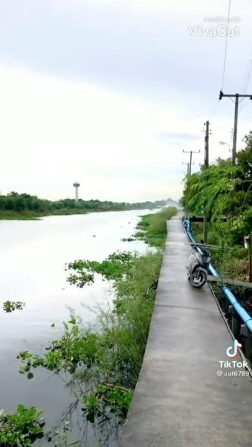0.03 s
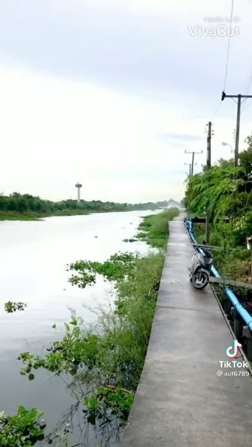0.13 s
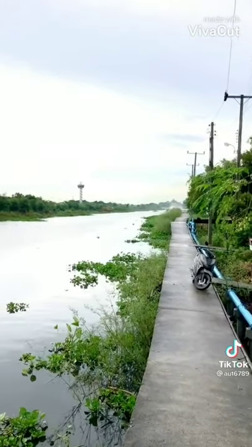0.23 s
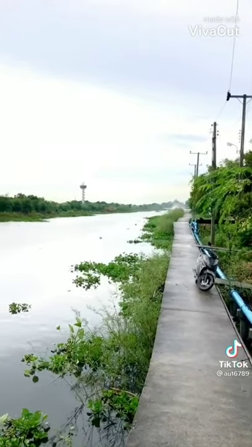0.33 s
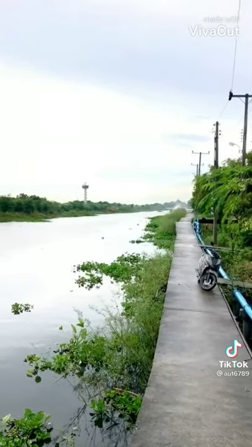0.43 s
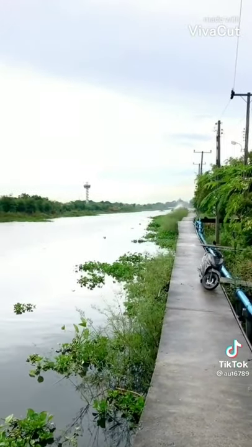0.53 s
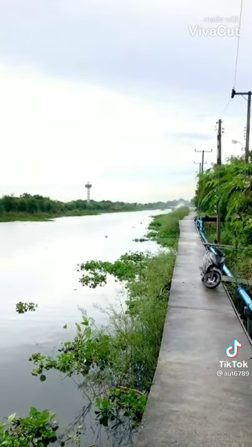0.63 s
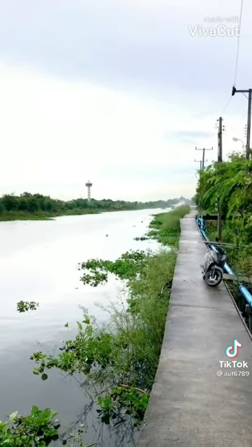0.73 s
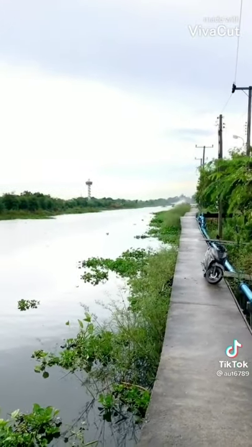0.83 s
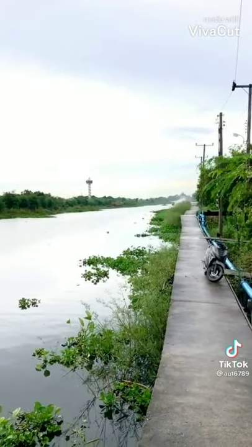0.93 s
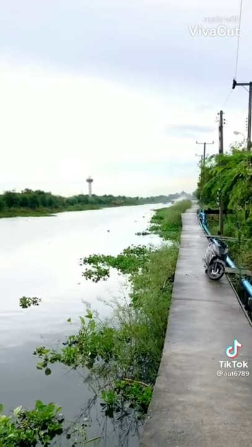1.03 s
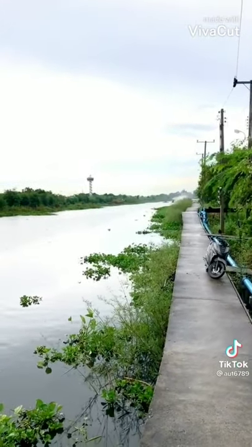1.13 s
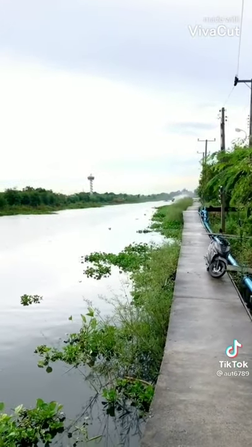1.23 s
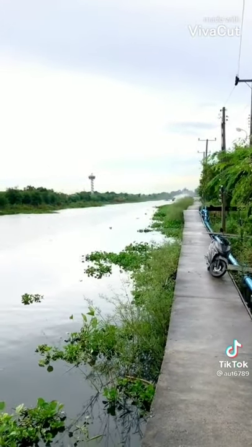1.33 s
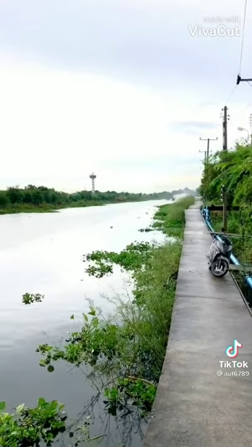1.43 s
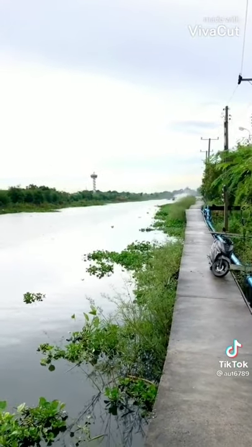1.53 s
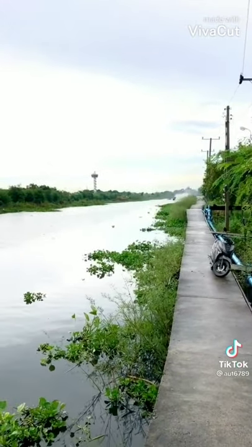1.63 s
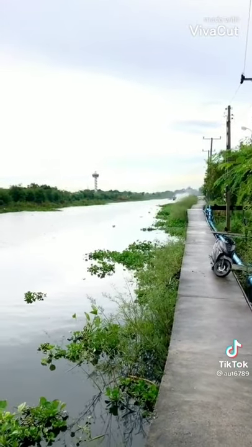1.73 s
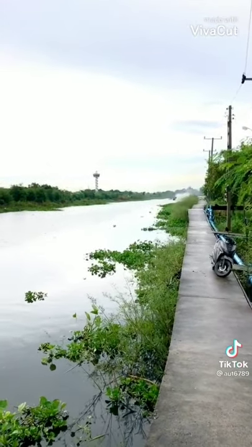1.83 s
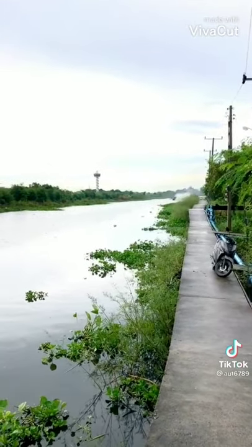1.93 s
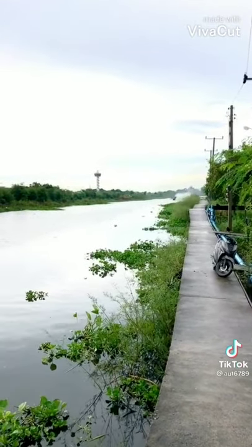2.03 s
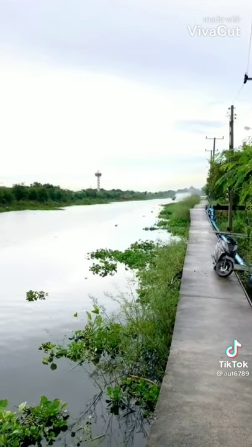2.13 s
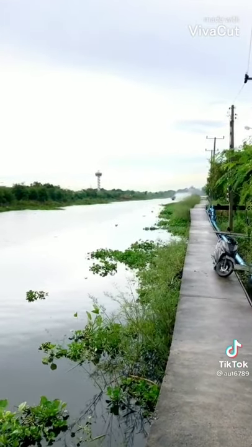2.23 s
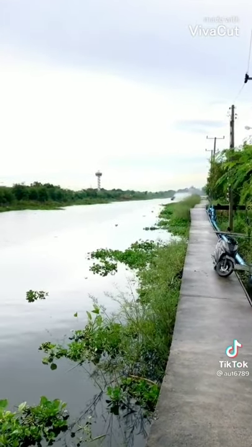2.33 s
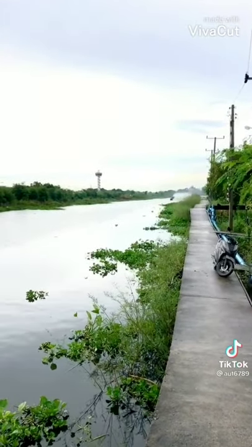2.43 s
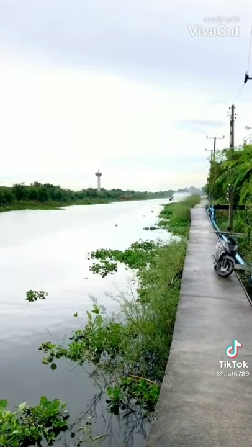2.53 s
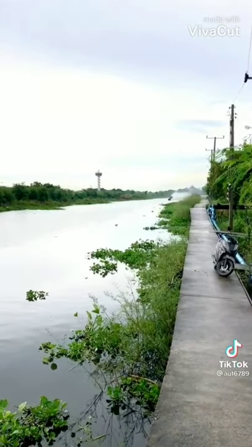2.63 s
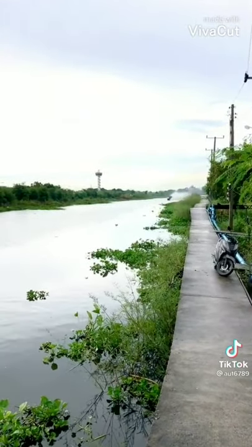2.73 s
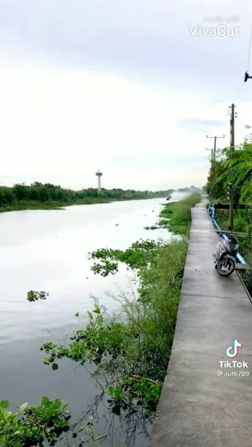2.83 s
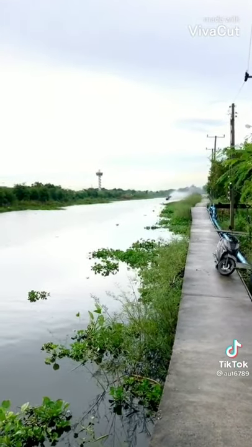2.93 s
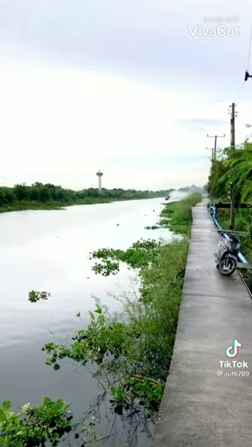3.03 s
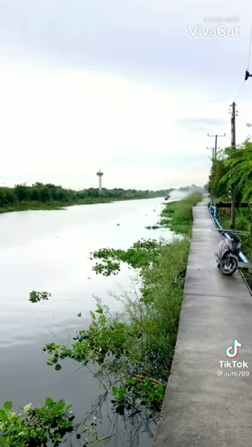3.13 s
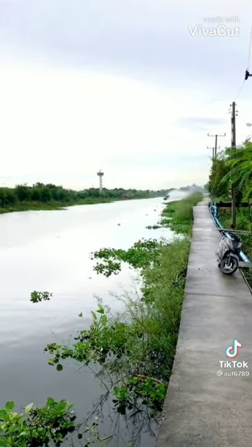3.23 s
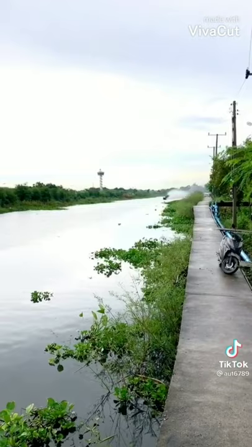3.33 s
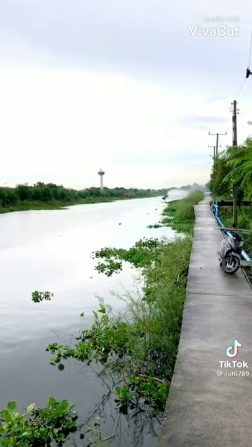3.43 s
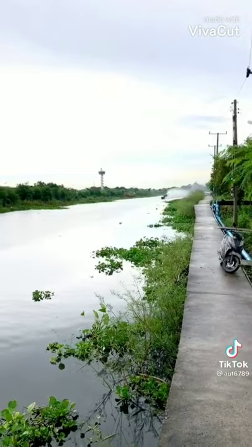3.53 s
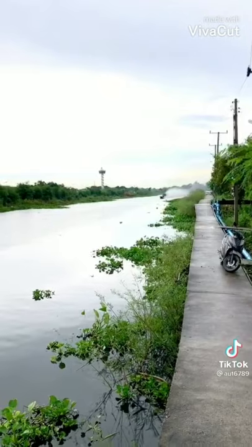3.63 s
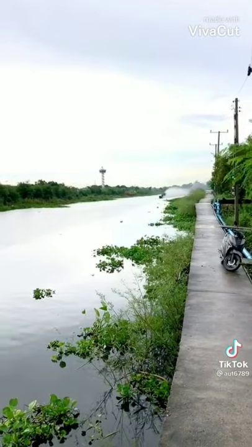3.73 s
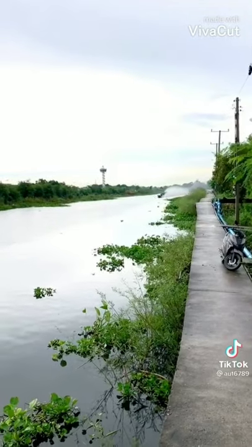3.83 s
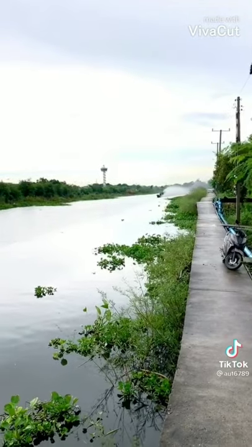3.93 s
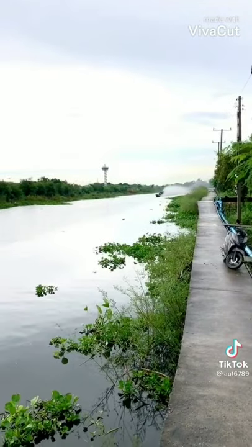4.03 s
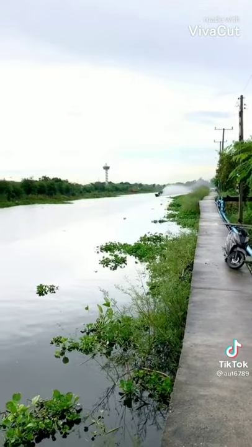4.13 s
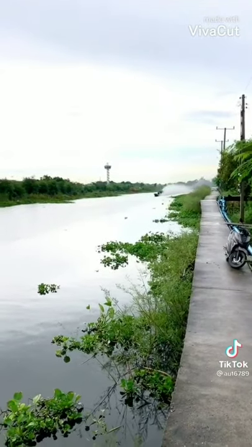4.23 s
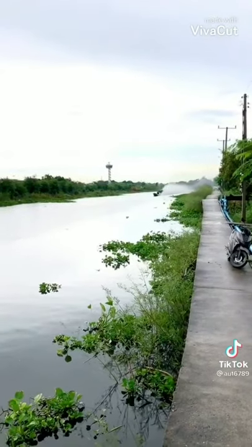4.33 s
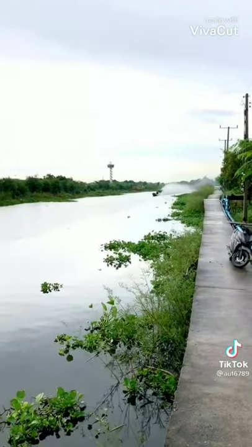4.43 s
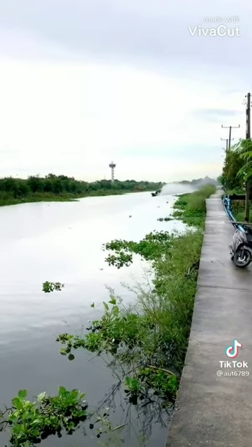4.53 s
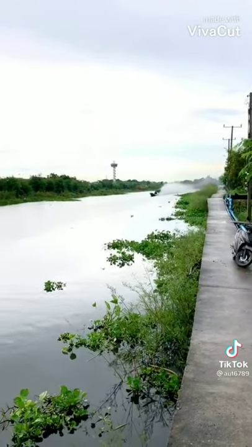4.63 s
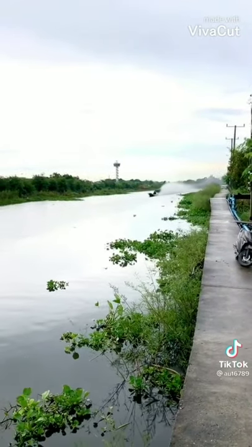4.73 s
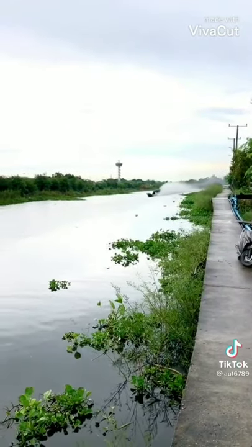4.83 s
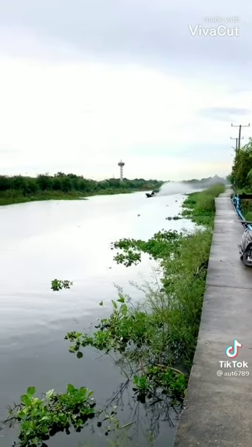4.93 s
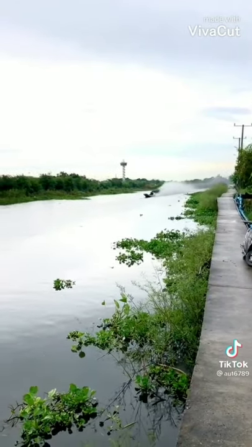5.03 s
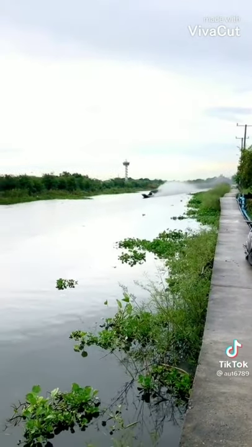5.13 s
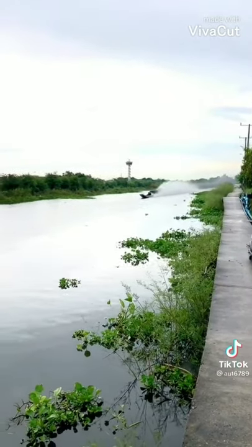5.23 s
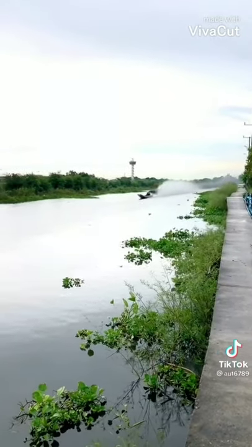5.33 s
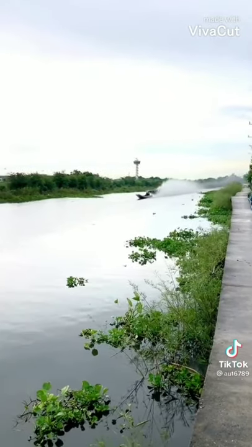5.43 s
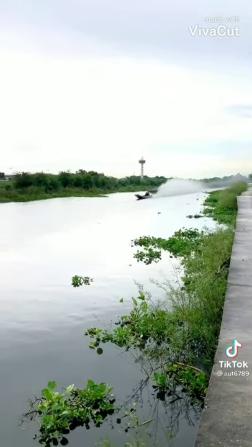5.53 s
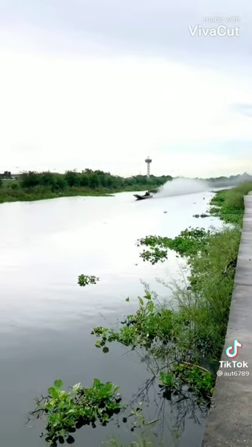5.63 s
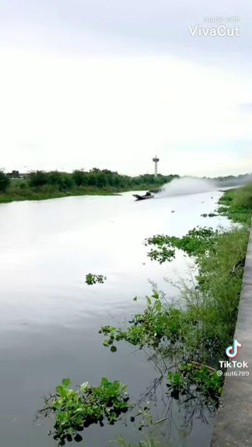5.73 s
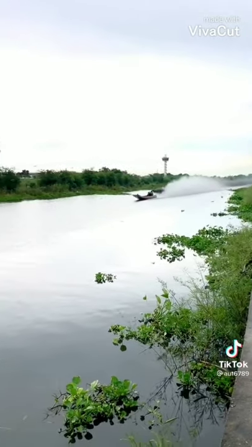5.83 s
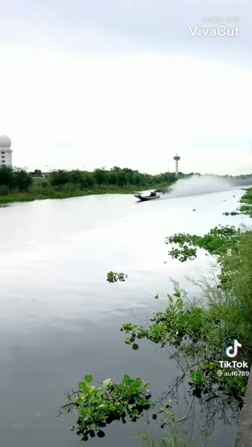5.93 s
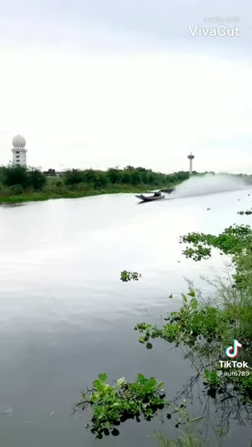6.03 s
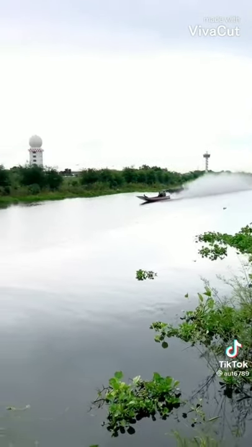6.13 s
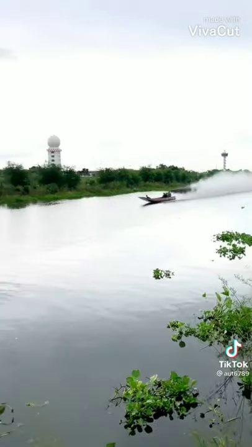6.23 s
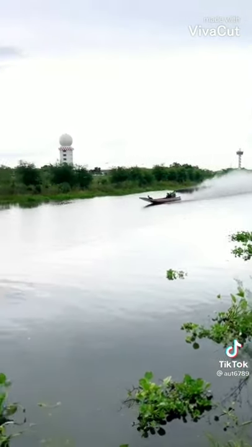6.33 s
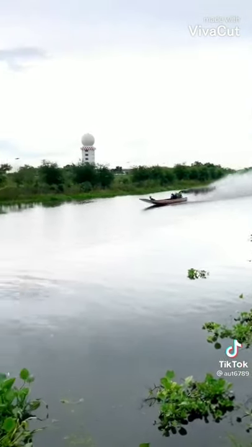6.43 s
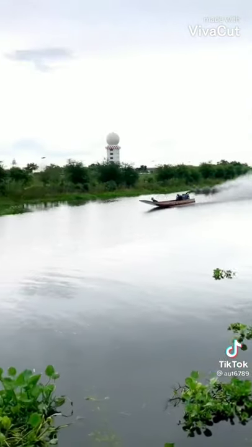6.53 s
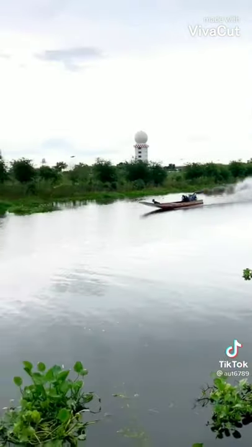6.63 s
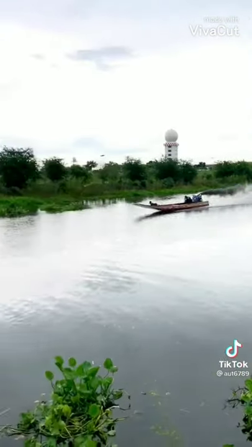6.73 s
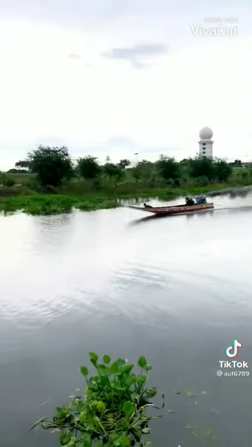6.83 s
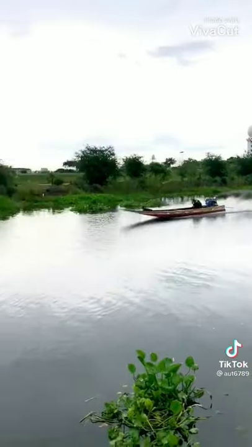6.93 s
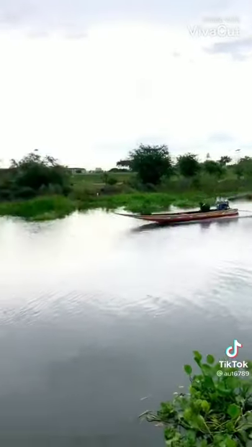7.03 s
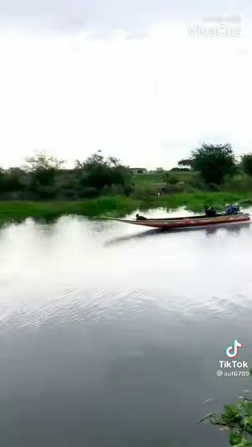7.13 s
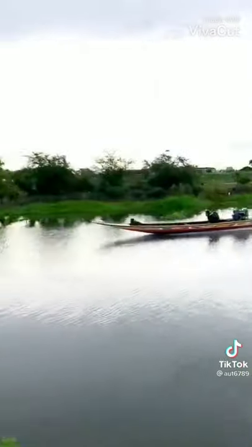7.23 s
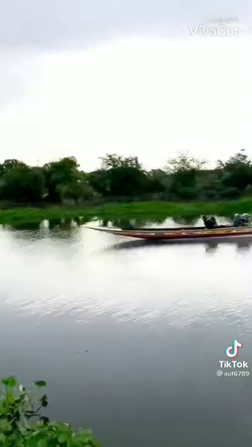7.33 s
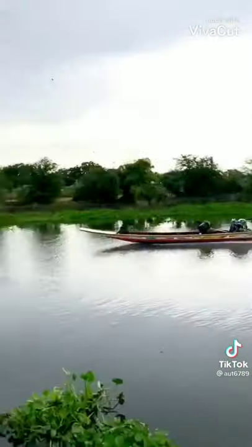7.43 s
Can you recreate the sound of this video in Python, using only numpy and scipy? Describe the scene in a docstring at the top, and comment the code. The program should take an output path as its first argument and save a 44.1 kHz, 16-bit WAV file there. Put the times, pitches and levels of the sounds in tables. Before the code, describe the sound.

Outdoors beside a canal, heard in mono through a phone microphone. From 0 s a faint, distant boat engine drones at a steady high rev, its firing tone near 160 Hz swelling and fading over the water, with soft water-and-air hiss beneath. From about 0.5 s a very thin whine around 2.5 kHz and its overtones creeps in, clearer after 3 s, flickering and flaring between 4 and 5.5 s. The engine pitch slowly climbs to nearly 200 Hz by 5 s while low hull rumble and rough exhaust roar build. The whine stops abruptly near 5.6 s. From 6 s the boat is close: harsh, ragged exhaust, bright grainy spray hiss and quick splashy gouts. The roar peaks around 6.75 s, slightly squashed by the microphone; then pitch dips a little and spray stays strong as the boat draws level, ending still loud at 7.5 s.

```python
"""On a canal bank, a phone hears a long-tail boat at full throttle come up from far away and draw level.
The exhaust fires twice a crank turn: sines at the engine orders over a rough roar of puffed noise.
The propeller throws a hissing plume of spray, hull and wake drone below, and far water and air hiss.
A thin harmonic whine shows on the approach, then stops.
The air takes less treble the nearer the boat is, and a bounce off water and bank cuts a moving band.
"""
import sys
import numpy as np
from scipy import signal
from scipy.io import wavfile
from scipy.ndimage import uniform_filter1d

SR = 44100
rng = np.random.default_rng(int(sys.argv[2]) if len(sys.argv) > 2 else 0)


def master(y):
    """Save y as 16-bit WAV."""
    cut = np.clip(np.atleast_2d(y).T, -1, 1)
    pcm = np.round(cut * 32767)  # scale
    wavfile.write(sys.argv[1], SR, pcm.astype(np.int16))


def invert_db(level):
    """Linear amplitude ratio for a level in decibels (20 dB per decade), elementwise."""
    return 10 ** (np.asarray(level, dtype=float) / 20)


N = 329868  # samples

# Straight run past the phone: speed in m/s, moment abreast in s, nearest distance in m.
SPEED_M_PER_S, LEVEL_S, NEAREST_M = 25, 7.3, 14
AIR_DB_PER_M = 0.1069  # treble lost to the air at 8500 Hz
# Direct sound and its bounce off water and bank cancel in a moving band.
# Each row: time in seconds, centre in Hz, depth in dB.
BOUNCE_DIP = [(0, 420, 1.5), (1.3, 440, 6), (2.3, 530, 6), (3.2, 804, 3.5), (3.7, 1080, 3), (4.2, 1509, 0)]
# The boat at the bank. Each row: time in seconds, crank turns per second as heard in Hz,
# roar level in dB, spray level in dB.
BOAT_RUN = [(0.0, 80.4, -52.5, -57.5), (0.5, 82.24, -49, -56.5), (1.2, 83.1, -47.5, -54.5),
            (2.0, 87.8, -46, -52), (2.6, 91.2, -44.5, -50), (3.2, 92.9, -42.5, -47),
            (3.8, 95.1, -39, -43.5), (4.3, 96.8, -35, -41), (4.8, 98.4, -32, -34),
            (5.15, 99.37, -25.5, -30), (5.7, 98.32, -22, -28.5), (6.1, 98.76, -19, -25.5),
            (6.45, 98.4, -16, -22.5), (6.75, 98.26, -9.5, -17), (7.1, 96.28, -13.5, -18),
            (7.48, 93.6, -17.5, -17)]

# Far water and air, relative spectrum. Each row: frequency in Hz, density in dB per Hz.
FAR_HISS_SPECTRUM = [(590, -30), (1000, -4), (1200, 2.5), (1650, 7), (2220, -16), (2410, -10), (3390, -13),
                     (8340, -18), (15300, -32)]
FAR_HISS_DB = -60
# Hull and wake, relative spectrum. Each row: frequency in Hz, density in dB per Hz.
RUMBLE_SPECTRUM = [(15, -46), (25, -10.5), (81, 2.5), (119, 0), (145, 0.5), (173, -2), (200, -23),
                   (260, -5.5), (440, -120)]
# Rumble in dB when the roar is at NEAR_ROAR_DB, and the share of the roar's rise in dB that it follows.
RUMBLE_NEAR_DB, RUMBLE_SHARE, NEAR_ROAR_DB = -27, 0.4, -12

# The whine before flares and flicker. Each row: time in seconds, pitch in Hz,
# peak level of the second partial in dB, peak level of the fifth partial in dB.
WHINE_TRACK = [(0.5, 2465, -78, -101), (1.3, 2500, -73, -99), (2.5, 2546, -71, -101), (3.3, 2636, -59, -93),
               (3.85, 2660, -60, -84), (4.1, 2630, -52, -79), (4.55, 2645, -49, -77), (5.0, 2642, -42, -69),
               (5.56, 2632, -44, -68)]
# Partials 1, 3 and 4 against the second in dB, before the air's loss.
WHINE_PARTIALS_DB = [-9, -9, -18]
# Moments when the whine flares. Each row: time in seconds, rise of the fifth partial in dB.
WHINE_FLARES = [(4.02, 7), (4.12, 8), (4.36, 2), (4.64, 11), (4.87, 9), (4.99, 10), (5.14, 16), (5.32, 9),
                (5.48, 12)]
FLARE_S, FLARE_LOW = .04, .3  # width in s, share of the rise in dB given to the lower partials

# The plume close by, relative spectrum. Each row: frequency in Hz, density in dB per Hz.
SPRAY_SPECTRUM = [(290, -15), (500, -10), (620, 2), (695, -12.5), (779, -6), (1020, -10.5), (1530, -7.5),
                  (1660, -8), (2060, -10.5), (2670, -9), (3700, -12), (5690, -15), (8620, -14.5),
                  (13600, -26.5), (15300, -30)]
# The clearest gouts of spray. Each row: time in seconds, strength in dB before its share of level and treble.
SPRAY_GOUTS = [(4.825, 5.5), (5.03, 2.5), (5.077, 5), (5.12, 5.5), (5.21, -4), (5.391, 4), (6.179, 3.5),
               (6.221, 3.5), (6.48, 3), (6.618, 3), (6.708, 1), (6.75, 0.5), (6.778, 4.5), (6.88, 2),
               (6.955, 3), (7.115, 3), (7.228, 7.5), (7.256, 4), (7.305, 6), (7.363, 6.5), (7.425, 3),
               (7.453, 6.5), (7.468, 0)]
# Bands heard from the side of the boat. Each row: centre in Hz, width in Hz, rise in dB.
ABEAM_BANDS = [(1720, 290, 5), (2630, 500, 3.5)]

# The roar close by, relative spectrum. Each row: frequency in Hz, density in dB per Hz.
ROAR_SPECTRUM = [(53, -42), (90, -20), (140, -2), (174, -3.5), (199, 2), (267, -5), (332, -4.5),
                 (385, -6.5), (426, -3), (589, -8), (734, -10), (1190, -14.5), (2170, -34), (3000, -35),
                 (3900, -64), (6600, -120)]
# Exhaust pipe resonances. Each row: centre in Hz, width in Hz, rise in dB.
PIPE_RESONANCES = [(374, 17, 14.5), (652, 200, 5.5)]

# Propeller load beats the engine tones: rate as a share of crank rate, each sideband in dB under its tone.
PROP_RATIO, PROP_DB = .28, -14
# The firing tone swells and fades on its way over the water. Each row: time in seconds, level in dB.
FIRING_LEVEL = [(0, -40), (.62, -40.5), (.75, -70), (1.0, -58), (1.15, -44.5), (1.62, -43.5), (1.75, -45),
                (2.0, -45), (2.5, -39.5), (3.0, -43), (3.15, -34), (3.62, -40), (3.75, -42), (3.95, -40),
                (4.12, -58), (4.28, -35), (4.4, -35), (4.62, -30), (5.25, -29.5), (5.4, -31), (5.65, -26.5),
                (6.0, -26), (6.15, -17.5), (6.7, -14.5), (6.88, -18), (7.0, -11.5), (7.25, -16),
                (7.38, -29.5), (7.48, -14.5)]
# The other engine orders. Each row: time in seconds, order four in dB, even orders six and up in dB,
# odd orders in dB, once-a-turn beat in dB.
ORDER_LEVELS = [(0, -55, -59, -60, -54), (.55, -55, -58, -63, -57), (1.0, -59, -63, -63, -52),
                (1.5, -55, -62, -61, -46), (1.9, -52, -61, -57, -53), (2.35, -53, -62, -57, -47),
                (2.9, -48, -56, -51, -48), (3.6, -46, -52, -46, -43), (4.1, -42, -44, -44, -39),
                (4.6, -40, -43, -40, -38), (5.15, -32, -36, -34, -37), (5.75, -30, -35, -34, -34),
                (6.0, -28, -29, -35, -37), (6.3, -24, -24, -31, -30), (6.75, -22, -33, -32, -35),
                (6.95, -29, -33, -33, -35), (7.15, -29, -30, -33, -36), (7.48, -25, -33, -36, -35)]
# Engine order to the level it follows: a column of ORDER_LEVELS, counted from 0 after the time.
ORDER_COLUMN = {1: 3, 3: 2, 4: 0, 5: 2, 6: 1, 7: 2, 8: 1, 9: 2, 10: 1}
# Each of those orders in turn, against the level it follows, in dB.
ORDER_OFFSET_DB = [-1, 0, 0, -2, 0, -8, -4, -14, -9]


def evened(x):
    """Scales to rms 1."""
    return x / np.sqrt(np.mean(x ** 2) + 1e-20)


def read(points, hz):
    """A spectrum table read on a log-frequency axis."""
    f, value = np.transpose(points)
    return np.interp(np.log(hz + 1), np.log(f + 1), value)


def columns(rows, t):
    """The columns of a curve table at times t."""
    s, *rest = np.transpose(rows)
    return [np.interp(t, s, c) for c in rest]


def resonances_db(bands, hz):
    """Sum of rounded peaks (centre Hz, width Hz, dB)."""
    return sum(db / (1 + (2 * (hz - f) / width) ** 2) for f, width, db in bands)


def slow(per_s):
    """Random drift of rms 1 with about per_s wiggles a second."""
    span = max(int(SR / per_s), 1)
    smooth = uniform_filter1d(rng.standard_normal(N), span)
    return evened(uniform_filter1d(smooth, span))


def shaped(x, colour_db, band, size):
    """Colours x frame by frame; each frame's gain is scaled to keep rms 1 inside band (lo, hi Hz)."""
    overlap = size * 3 // 4
    hz, t, z = signal.stft(x, SR, nperseg=size, noverlap=overlap)
    gain = invert_db(colour_db(hz[:, None], t))
    inside = (hz >= band[0]) & (hz < band[1])
    gain = gain / np.sqrt((gain[inside] ** 2).sum(0) / len(hz))
    return signal.istft(z * gain, SR, nperseg=size, noverlap=overlap)[1][:N]


def far_db(t):
    """Air loss at 8500 Hz over the distance beyond the nearest, as negative dB."""
    distance_m = np.hypot(NEAREST_M, SPEED_M_PER_S * (LEVEL_S - t))
    return -AIR_DB_PER_M * (distance_m - NEAREST_M)


def air_loss_db(hz, t, power=2.07):
    """Distance dulls the treble: the loss grows as a power of frequency."""
    return far_db(t) * (hz / 8500) ** power


def bounce_db(hz, t, octaves=0.47, lift=0.065):
    """The bounce cancels one band, with a gentle lift below it where the two paths add."""
    dip_hz, depth_db = columns(BOUNCE_DIP, t)
    away = np.log2((hz + 1) / dip_hz) / octaves  # distance from the dip in dip widths
    return depth_db * (lift * np.exp(-(away + 1.5) ** 2) - np.exp(-away ** 2))


def crank(t):
    """Crank angle in turns; the flywheel smooths every change of speed."""
    speed_hz = columns(BOAT_RUN, t)[0]
    return np.cumsum(uniform_filter1d(speed_hz, size=SR // 3)) / SR


def air():
    """Steady faint hiss of far water and air: noise of one fixed colour."""
    def colour(hz, frames):
        return read(FAR_HISS_SPECTRUM, hz) + 0 * frames
    return invert_db(FAR_HISS_DB) * shaped(rng.standard_normal(N), colour, (1000, 15400), size=1024)


def rumble(t, surge_db=1.0):
    """Hull and wake droning low: noise that rises more gently than the roar and surges a little."""
    def colour(hz, frames):
        return read(RUMBLE_SPECTRUM, hz) + 0 * frames
    low = shaped(rng.standard_normal(N), colour, (40, 140), size=4096)
    roar_rise_db = columns(BOAT_RUN, t)[1] - NEAR_ROAR_DB
    return invert_db(RUMBLE_NEAR_DB + RUMBLE_SHARE * roar_rise_db + surge_db * slow(5.7)) * low


def whine(t, fuzz=.0045, flicker_db=3):
    """A thin whine of five harmonic partials: pitch jitter (share of pitch) fuzzes it, levels flicker."""
    hz, second_db, fifth_db = columns(WHINE_TRACK, t)
    flare_db = sum(db * np.exp(-((t - s) / FLARE_S) ** 2 / 2) for s, db in WHINE_FLARES)
    second_db = second_db + FLARE_LOW * flare_db
    fifth_db = fifth_db + flare_db
    fuzzy_hz = uniform_filter1d(hz, size=SR // 8) * (1 + fuzz * slow(284))
    turns = np.cumsum(fuzzy_hz) / SR
    # the air's loss on partials 1, 3 and 4 against its loss on the second
    loss_db = [air_loss_db(k * hz, t) - air_loss_db(2 * hz, t) for k in (1, 3, 4)]
    first_db, third_db, fourth_db = (second_db + db + loss for db, loss in zip(WHINE_PARTIALS_DB, loss_db))
    out = np.zeros(N)
    for k, db in enumerate([first_db, second_db, third_db, fourth_db, fifth_db], start=1):
        out += invert_db(db + flicker_db * slow(70)) * np.cos(2 * np.pi * k * turns)
    sounding = np.clip((WHINE_TRACK[-1][0] - t) / 0.034 + 1, 0, 1)  # stops within 34 ms
    return sounding * out


def spray(t, slap_db=0.5, patchy_db=1.5, grain_db=1.0):
    """The propeller's plume: grainy, patchy hiss with gouts, its throb and grain clearer near the boat."""
    near = np.clip(0.9 + far_db(t) / 14, .25, 1)
    drops = invert_db(grain_db * near * slow(600))
    throb = slow(90)
    throb -= uniform_filter1d(throb, size=SR // 14)  # only the quick throb, no slow swell
    gout_s = .005
    clear_gouts = sum(db * np.exp(-((t - s) / gout_s) ** 2 / 2) for s, db in SPRAY_GOUTS)
    gouts = slap_db * near * throb + clear_gouts

    def colour(hz, frames):
        patches = rng.standard_normal((len(frames), len(hz))).T
        patches = uniform_filter1d(patches, size=5, axis=0)  # blurred over frequency
        patches = evened(uniform_filter1d(patches, size=14, axis=1))  # and over time
        # gouts are brighter than the hiss
        bright = np.interp(frames, t, gouts) * np.exp(-np.log2((hz + 1) / 9000) ** 2 / 2.0)
        abeam = np.clip((frames - 6.7) / .5, 0, 1)  # two bands stand out as the boat draws level
        bright += abeam * resonances_db(ABEAM_BANDS, hz)
        path = air_loss_db(hz, frames) + bounce_db(hz, frames)
        return read(SPRAY_SPECTRUM, hz) + path + patchy_db * patches + bright

    rasp = 1 + .1 * np.cos(4 * np.pi * crank(t))  # each firing kicks the plume
    drive = evened(rasp * drops * invert_db(0.58 * gouts)) * rng.standard_normal(N)
    return invert_db(columns(BOAT_RUN, t)[2]) * shaped(drive, colour, (1500, 5000), size=512)


def roar(t, gate=0.19, uneven_db=11.0, far_tilt_db=0.206):
    """Each firing lets out a puff of turbulent gas, one cylinder pair stronger, sizes uneven."""
    firing = 2 * crank(t)
    sizes = np.clip(rng.standard_normal(int(firing[-1]) + 1), -2, 2)
    size_db = uneven_db * sizes[firing.astype(int)]
    stronger_db = 1.0 * (firing % 2 < 1)
    puff = np.exp(-(firing % 1) / 0.48) * invert_db(size_db + stronger_db)
    # gate is the share of the drive that comes in puffs
    drive = evened(1 - gate + gate * evened(puff)) * rng.standard_normal(N)

    def colour(hz, frames):
        dull = far_tilt_db * far_db(frames) * np.log2((hz + 1) / 400)  # darker from afar
        close = np.clip((columns(BOAT_RUN, frames)[1] + 22) / 8, 0, 1)  # the pipe is heard only from close by
        pipe = close * resonances_db(PIPE_RESONANCES, hz)
        return read(ROAR_SPECTRUM, hz) + dull + pipe + bounce_db(hz, frames)

    return invert_db(columns(BOAT_RUN, t)[1]) * shaped(drive, colour, (230, 1000), size=2048)


def exhaust_tones(t):
    """Engine orders as sines that waver and fade as the path over the water shifts."""
    waver_db, waver_per_s = .4, 13  # dB at order two, growing as the root of the order
    wander, wander_per_s = .05, 8  # phase drift in radians per order
    fading_db = 2
    turns, speed_hz = crank(t), columns(BOAT_RUN, t)[0]
    level_db = columns(ORDER_LEVELS, t)
    beat = 1 + 2 * invert_db(PROP_DB) * np.cos(2 * np.pi * PROP_RATIO * turns + slow(5.1))
    orders_db = {}
    for (k, column), offset_db in zip(ORDER_COLUMN.items(), ORDER_OFFSET_DB):
        orders_db[k] = offset_db + level_db[column] + bounce_db(k * speed_hz, t) + fading_db * slow(6.3)
    orders_db[2] = columns(FIRING_LEVEL, t)[0]  # the firing tone has its fades in its table
    out = np.zeros(N)
    for k, db in orders_db.items():
        level = invert_db(db + waver_db * np.sqrt(k / 2) * slow(waver_per_s))
        out += level * np.cos(2 * np.pi * k * turns + wander * k * slow(wander_per_s) - k)
    return np.sqrt(2) * beat * out  # root two makes the order levels rms


def scene():
    """Surroundings and boat as they reach the bank, one channel."""
    t = np.arange(N) / SR
    mix = air() + rumble(t) + whine(t) + spray(t) + roar(t) + exhaust_tones(t)
    return mix[None]


def top_cut(x):
    """Nothing passes above the cut-off."""
    return signal.sosfilt(signal.butter(12, 15420, fs=SR, output="sos"), x)


def record(dry):
    """The microphone hisses and drops deep bass; gain control evens loud swells; peaks round off."""
    bass_hz, hiss_db = 42, -80
    knee_db, squeeze = -11, .5  # gain control takes this share of the dB above the knee
    ceiling = .92
    heard = dry + invert_db(hiss_db) * rng.standard_normal(dry.shape)
    thin = signal.sosfilt(signal.butter(2, bass_hz, "high", fs=SR, output="sos"), heard)
    power_db = 10 * np.log10(uniform_filter1d(thin ** 2, size=900) + 1e-12)
    over_db = uniform_filter1d(np.maximum(power_db - knee_db, 0), size=300)
    held = thin / invert_db(squeeze * over_db)
    rounded = held / (1 + abs(held / ceiling) ** 4) ** (1 / 4)
    low_pass = signal.firwin(511, 15450, window=("kaiser", 9), fs=SR)
    finished = signal.oaconvolve(rounded, low_pass[None], "same")
    return top_cut(finished)


dry = scene()
out = record(dry)
master(out)
```